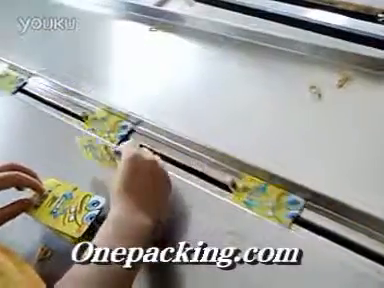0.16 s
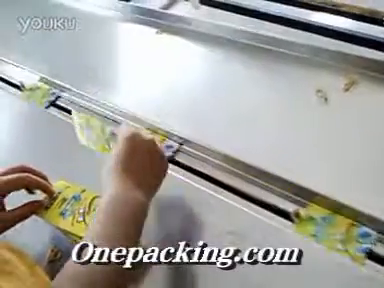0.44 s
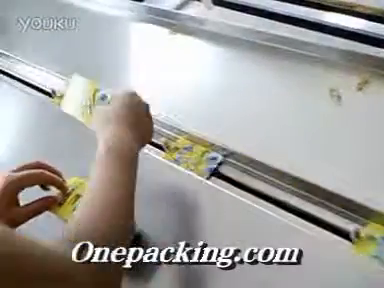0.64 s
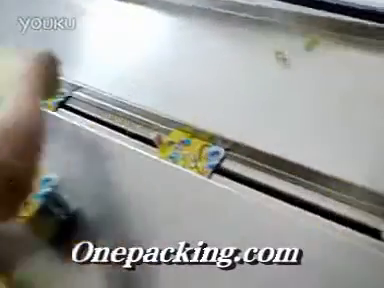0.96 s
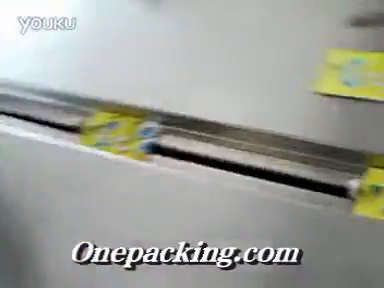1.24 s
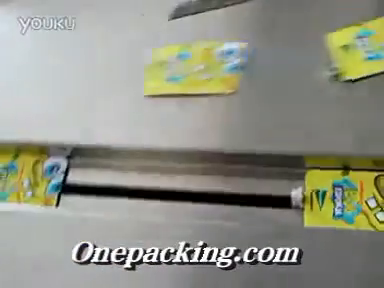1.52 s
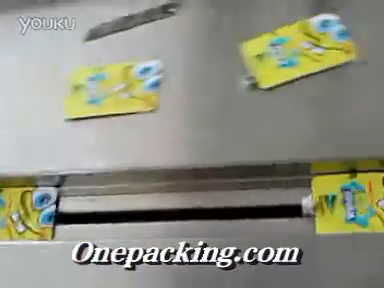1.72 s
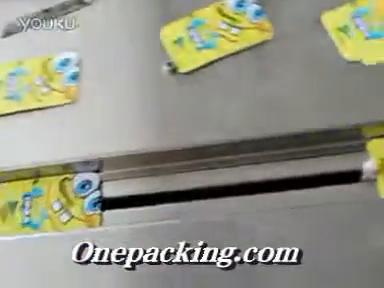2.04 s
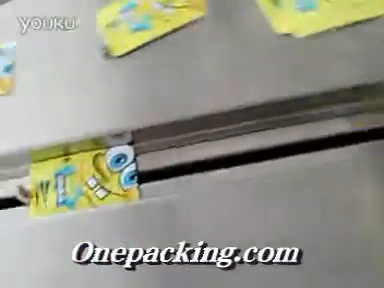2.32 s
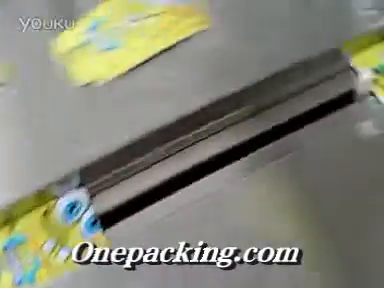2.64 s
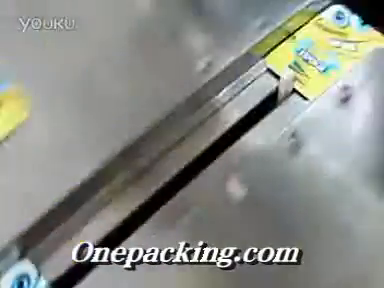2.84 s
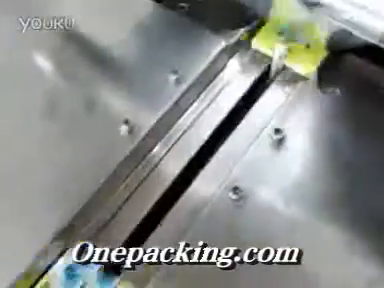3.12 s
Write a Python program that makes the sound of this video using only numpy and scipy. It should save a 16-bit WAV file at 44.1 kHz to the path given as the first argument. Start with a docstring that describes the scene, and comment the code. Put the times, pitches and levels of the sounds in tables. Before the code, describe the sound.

A packaging machine and conveyor drone steadily, with irregular metallic clicks, rattles and ringing knocks.

```python
"""Factory hall: a packaging machine and its conveyor, close to a small mono camera.
Chain links and cams click and rattle, pushers knock a steel guide rail that rings, parts scrape and clink.
Gears and motors whine over the broad drone of motors, belts and air.
The microphone passes little above 4.8 kHz and clips at full scale."""
import sys
import numpy as np
from scipy import signal
from scipy.fft import rfft, irfft, next_fast_len
from scipy.io import wavfile
from scipy.ndimage import uniform_filter1d, map_coordinates

SR = 44100
rng = np.random.default_rng(int(sys.argv[2]) if len(sys.argv) > 2 else 0)


def master(y):
    """Save y as 16-bit WAV."""
    cut = np.clip(np.atleast_2d(y).T, -1, 1)
    pcm = np.round(cut * 32767)  # scale
    wavfile.write(sys.argv[1], SR, pcm.astype(np.int16))


N = 144207


def amp(db):
    """dB to gain."""
    return 10 ** (np.asarray(db) / 20)


def unit(x):
    """Scale to rms 1."""
    return x / np.sqrt(np.mean(x ** 2) + 1e-20)


def curves(rows):
    """Per-sample curve of each column after t/s."""
    s, *cols = np.transpose(rows)
    return [np.interp(np.arange(N) / SR, s, c) for c in cols]


def wobble(knots_per_s):
    """Smooth random curve, up to 40 knots/s."""
    knots = rng.standard_normal(int(N / SR * 40) + 4)
    return map_coordinates(knots, [np.arange(N) * knots_per_s / SR])


def filtered(x, response):
    """Apply a complex frequency response."""
    m = next_fast_len(N + SR // 2)
    return irfft(rfft(x, m) * response(np.fft.rfftfreq(m, 1 / SR)), m)[..., :N]


def resonance(hz, width_hz):
    """Causal resonance, peak gain 1."""
    return lambda f: 1j * f * width_hz / (hz * hz - f * f + 1j * f * width_hz)


def rush(spectrum, patchy_db):
    """Coloured noise, rms 1, with time-frequency patches of random gain."""
    z = signal.stft(rng.standard_normal(N), nperseg=512)[2]
    patches = uniform_filter1d(uniform_filter1d(rng.standard_normal(z.shape), 5, 0), 8, 1)
    noise = signal.istft(z * amp(patchy_db * unit(patches)), nperseg=512)[1][:N]
    f, db = np.transpose(spectrum)
    return unit(filtered(noise, lambda hz: amp(np.interp(np.log(hz + 1), np.log(f + 1), db))))


def add(track, start_s, sound):
    """Mix in at start_s."""
    part = track[round(start_s * SR):][:len(sound)]
    part += sound[:len(part)]


def chain_clicks():
    """Links and cams: a soft contact snaps and rings three modes; small ones rattle at random."""
    # contacts: t/s, level/dB, low mode/dB, mid mode/dB, high mode/dB, high mode f/Hz
    contacts = [(0.218, -22.5, 18, -3, 5, 3010), (0.3077, -8, 0, -11.5, -4.5, 2970),
                (0.6482, -15, 3.5, 10, 0, 3000), (0.843, -23, 4, -13, -11, 3370),
                (0.8646, -5, -3, -5.5, -3.5, 2930), (0.9874, -7.5, 6, 5, 2, 2910),
                (1.0151, -15, -26, -4, -5, 2920), (1.1011, -1.5, 3, 1, -6, 3020),
                (1.1698, -7, 1, 1.5, -12, 3000), (1.2298, -6.5, 2, 1, -11, 2940),
                (1.3523, -11.5, -3, -6, -6, 3310), (1.5934, -11, 0, 2.5, -5, 3260),
                (1.9019, -9, 0, 2.5, -6.5, 3340), (1.9989, -7.5, -5, -12, -8, 3330),
                (2.0636, -5.5, 1, 1, -10.5, 2880), (2.1118, -11, 0, -2, -4.5, 3340),
                (2.177, -8, 2.5, -1, -1.5, 3420), (2.2428, -4.5, -2, -4, -6, 3320),
                (2.3005, -8, -8, -12.5, -7, 2870), (2.3424, -13.5, 4, -20, -10.5, 3350),
                (2.7377, -5.5, -8, -14, -8.5, 3440), (2.7521, 7.5, -6, -3.5, -14, 3110),
                (2.8336, -6, 5.5, 8.5, -0.5, 3260), (2.9115, 7.5, -4, -7.5, -6.5, 3230),
                (3.006, -19.5, 3.5, -2, 3, 2960)]
    # low and mid link modes: f/Hz
    link_hz = [1620, 2270]
    # low, mid and high link modes: width/Hz
    widths_hz = [200, 206, 172]
    rattles_per_s, rise_s, snap_decay_s = 60, .0019, .0033
    rattles = [(u[0] * N / SR, -26 - np.log(1 - u[1]), *(-9 * u[2:5]), 2800 + 600 * u[5])
               for u in rng.random((int(rattles_per_s * N / SR), 6))]  # columns as contacts
    out, t = np.zeros(N), np.arange(SR // 30) / SR
    rise = 1 - np.exp(-t / rise_s)
    for start_s, db, *modes_db, high_hz in rattles + list(contacts):
        ring = 0
        for hz, width_hz, mode_db in zip([*link_hz, high_hz], widths_hz, modes_db):
            cycles = hz * rng.normal(1, .012) * t + .11 * rng.random()
            ring += amp(mode_db) * np.exp(-np.pi * width_hz * t) * np.sin(2 * np.pi * cycles)
        snap = amp(-8.5) * np.exp(-t / snap_decay_s) * rng.standard_normal(len(t))
        add(out, start_s, amp(db + 2.5) * rise * (ring + snap))
    return out


def rail_knocks():
    """Pushers hit the steel rail: each knock ticks and feeds three modes roughly in phase."""
    # knocks: t/s, tick level/dB, level/dB of each rail mode
    knocks = [(.4005, -13.5, -21, -18.5, -17.5), (.5004, -13, -13, -20.5, -21),
              (0.5584, -13, -15, -17, -17), (0.5857, -15.5, -27, -32, -23),
              (.6384, -18, -16.5, -23.5, -20.5), (.7193, -24, -28, -31.5, -29),
              (0.7779, -23, -27.5, -33, -24), (1.4, -16, -20, -34, -18.5), (1.4394, -18, -25, -28, -28),
              (1.5294, -26.5, -31.5, -37, -27.5), (2.3923, -12.5, -20.5, -22.5, -25.5),
              (2.4044, -15.5, -19, -34.5, -18.5), (2.4923, -18, -18, -27.5, -24),
              (2.5044, -13.5, -20, -33.5, -23.5), (2.548, -12.5, -16, -17.5, -23),
              (2.579, -10.5, -21.5, -27, -21), (2.6384, -17, -28.5, -22, -30),
              (2.6823, -18, -26.5, -26, -30), (2.709, -22, -30, -27, -31)]
    # rail modes: f/Hz
    rail_hz = [2268, 2112, 2336]
    # rail modes: T60/s
    rail_t60_s = [.26, .2, .24]
    rise_s, tick_decay_s, tick_hz = .0011, .0038, 2200
    out, t = np.zeros(N), np.arange(SR // 3) / SR
    rise = 1 - np.exp(-t / rise_s)
    for start_s, tick_db, *modes_db in knocks:
        clock_s = t + round(start_s * SR) / SR  # common phase for all knocks
        ring = 0
        for hz, t60_s, db in zip(rail_hz, rail_t60_s, modes_db):
            cycles = hz * clock_s + .06 * rng.normal()
            ring += amp(db - 60 * t / t60_s) * np.sin(2 * np.pi * cycles)
        tick = amp(tick_db) * np.exp(-t / tick_decay_s) * np.sin(2 * np.pi * tick_hz * t)
        add(out, start_s, rise * ring + tick)
    return out


def scrapes():
    """Parts scrape and clink: decaying noise through two narrow resonances with broad skirts."""
    # scrapes: t/s, level/dB, decay/s, f1/Hz, f2/Hz
    rubs = [(.115, -23, 0.011, 2620, 2944), (1.397, -28.5, 0.031, 1100, 2000),
            (1.69, -32, 0.012, 1000, 1600), (1.54, -23.5, 0.01, 1130, 1430),
            (2.451, -25.5, 0.035, 1116, 1528), (3.034, -16.5, 0.0081, 2400, 2420),
            (3.053, -30.5, 0.026, 1460, 1710), (3.202, -26, 0.035, 1070, 1620)]
    rise_s, width_hz, skirt_hz = .0027, 120, 1200
    out, t = np.zeros(N), np.arange(SR // 5) / SR
    rise = 1 - np.exp(-t / rise_s)
    for start_s, db, decay_s, *pitches_hz in rubs:
        burst = np.zeros(N)
        add(burst, start_s, rise * np.exp(-t / decay_s) * rng.standard_normal(len(t)))
        sound = filtered(burst, lambda f: sum(
            resonance(hz, width_hz)(f) + .064 * resonance(hz, skirt_hz)(f) for hz in pitches_hz))
        out += amp(db) * sound / np.sqrt(np.sum(sound ** 2) / (decay_s * SR))
    return out


def whines():
    """Gears and motors: narrow noise hums and two wandering, fluttering tones."""
    # hums: f/Hz
    hums_hz = [599, 626, 851, 3237, 3334, 4570, 4666]
    # hums: width/Hz, level/dB
    hum_bands = [(23, -46), (24, -42), (5.6, -45.5), (23, -47), (8, -46), (15, -61), (2.7, -66.5)]
    # gear whine and high whine: f/Hz
    whines_hz = [1675, 3430]
    # gear whine envelope: t/s, level/dB
    gear_whine = [(0, -36), (.07, -40), (.13, -29), (.2, -28.5), (.3, -25.5), (.39, -32), (.44, -37),
                  (.7, -38.5), (.85, -42), (1.2, -43), (1.4, -38), (1.65, -39), (1.9, -64), (2.25, -36),
                  (2.6, -39), (2.95, -39.5), (3.1, -35), (3.27, -36)]
    # high whine envelope: t/s, level/dB
    high_whine = [(0.0, -51), (0.29, -57.5), (0.59, -64), (1.32, -46.5), (1.85, -49.5), (2.19, -45),
                  (2.34, -58), (2.59, -37.5), (2.7, -40), (3.13, -42.5), (3.27, -67)]
    drift_db, flutter_db, wander_hz = 2.5, 3.5, 7.2
    out = np.zeros(N)
    for hz, (width_hz, db) in zip(hums_hz, hum_bands):
        gain = amp(db + drift_db * wobble(3.5))
        out += gain * unit(filtered(rng.standard_normal(N), resonance(hz, width_hz)))
    for hz, envelope in zip(whines_hz, [gear_whine, high_whine]):
        phase = 2 * np.pi * np.cumsum(hz + wander_hz * wobble(30)) / SR
        gain = amp(curves(envelope)[0] + flutter_db * wobble(35))
        out += gain * np.sqrt(2) * np.sin(phase)
    return out


def drone():
    """Motors, belts and air: a low body and a brighter hiss."""
    # drone envelope: t/s, body level/dB, hiss level/dB
    envelope = [(0.0, -28, -35), (0.32, -28, -30), (0.5, -28, -33.5), (0.97, -29, -33.5),
                (1.16, -28.5, -32), (2.37, -27.5, -32.5), (2.91, -28, -32.5), (3.05, -30.5, -33),
                (3.27, -25, -33.5)]
    # body spectrum: f/Hz, relative density/dB
    body_spectrum = [(24, -55.5), (40, -23.5), (146, -15.5), (183, -16), (301, -8.5), (566, -7.5),
                     (613, -4), (676, -6), (996, -7), (1170, -3), (1380, -5), (1470, -5.5), (1620, -4),
                     (1900, -7.5), (2470, -22.5), (4180, -120)]
    # hiss spectrum: f/Hz, relative density/dB
    hiss_spectrum = [(1000, -26), (1700, -9.5), (1950, -6), (2250, -6), (2550, -4), (2800, -11), (3300, -9),
                     (3450, -16), (3700, -24.5), (4000, -36.5), (4300, -39.5), (4550, -41.5), (4750, -25),
                     (5000, -40.5)]
    body_db, hiss_db = curves(envelope)
    body = amp(body_db + 2 + .6 * wobble(14)) * rush(body_spectrum, patchy_db=1.2)
    hiss = amp(hiss_db + 3 + .8 * wobble(40)) * rush(hiss_spectrum, patchy_db=-.34)
    return body + hiss


def hall(x, t60_s=.22, gap_s=.004):
    """Short diffuse tail from the machine frame and walls."""
    t = np.arange(SR // 3) / SR
    tail = rng.standard_normal(len(t)) * amp(-60 * t / t60_s) * (t > gap_s)
    return signal.fftconvolve(x, tail / np.linalg.norm(tail))[:N]


def scene():
    """Mono mix on both channels; only clicks and scrapes get the band-pass and hall tail."""
    lowpass = lambda hz: 1 / (1 + (1j * hz / 3450) ** 2 + .95j * hz / 3450)
    bandpass = lambda hz: resonance(2000, width_hz=2600)(hz) * lowpass(hz) ** 3
    hits = filtered(chain_clicks() + scrapes(), bandpass)
    mono = hits + amp(-8) * hall(hits) + rail_knocks() + drone() + whines()
    return np.array([mono, mono])


def record(dry):
    """Narrow microphone band, overload at full scale, self-noise, output low-pass."""
    mic_hz, top_hz, self_noise_db = 4800, 12800, -88
    heard = filtered(dry, lambda hz: np.clip((mic_hz - hz) / 60, 0, 1))
    heard = np.clip(heard, -1, 1)
    heard += amp(self_noise_db) * rng.standard_normal(N)
    return filtered(heard, lambda hz: np.clip((top_hz - hz) / 600, 0, 1))


dry = scene()
out = record(dry)
master(out)
```